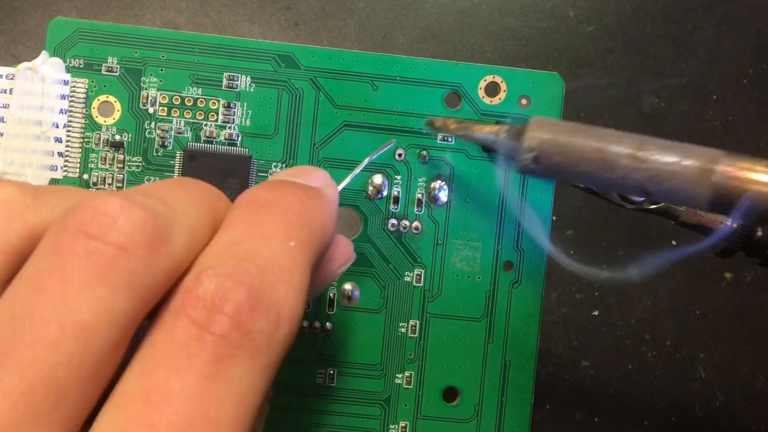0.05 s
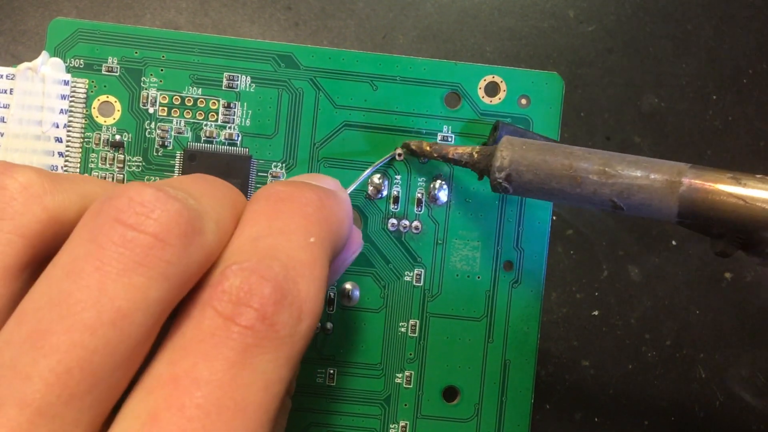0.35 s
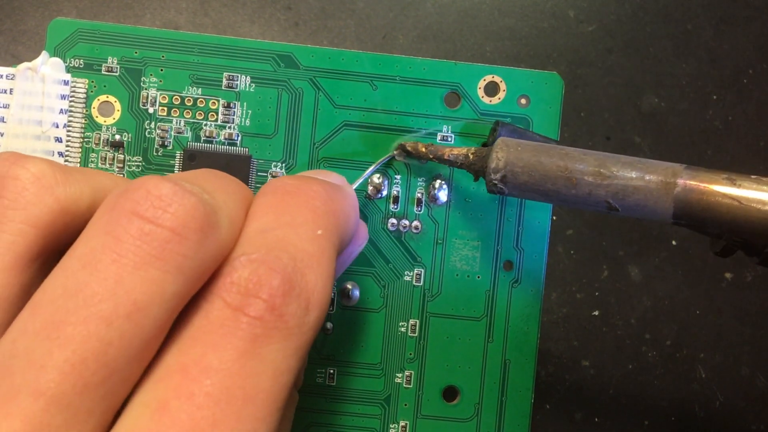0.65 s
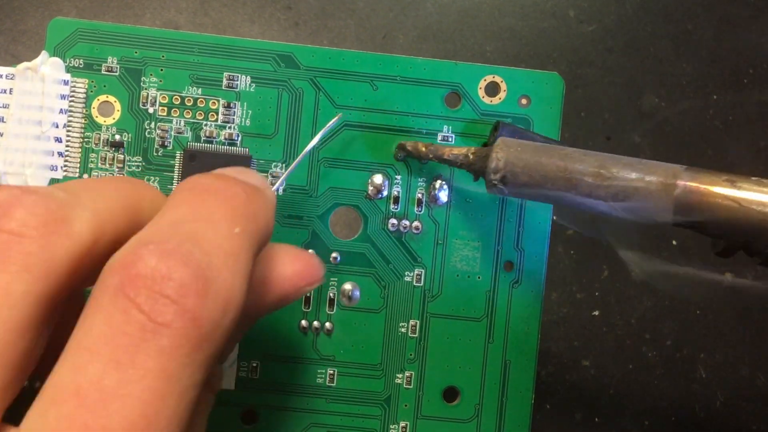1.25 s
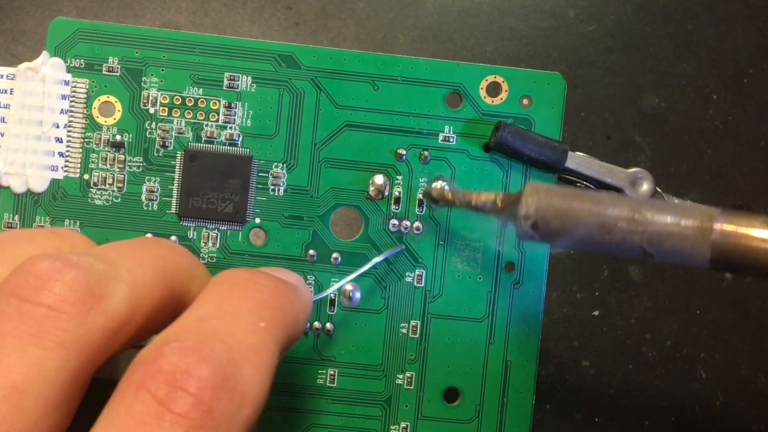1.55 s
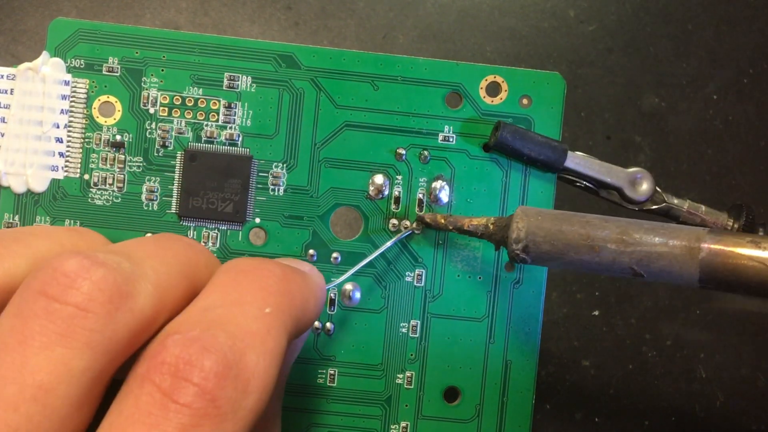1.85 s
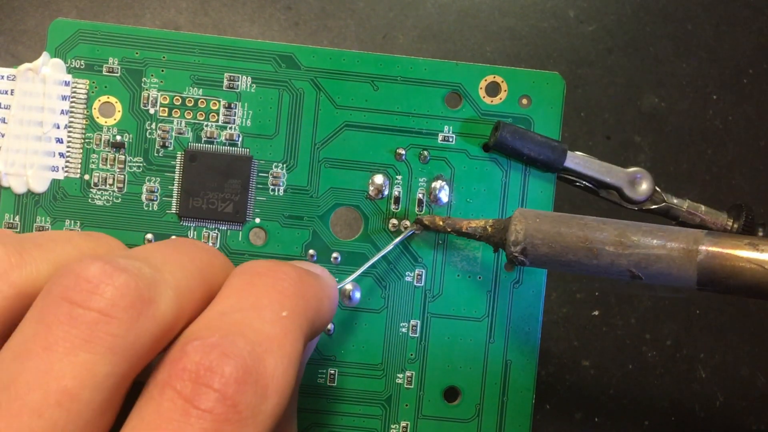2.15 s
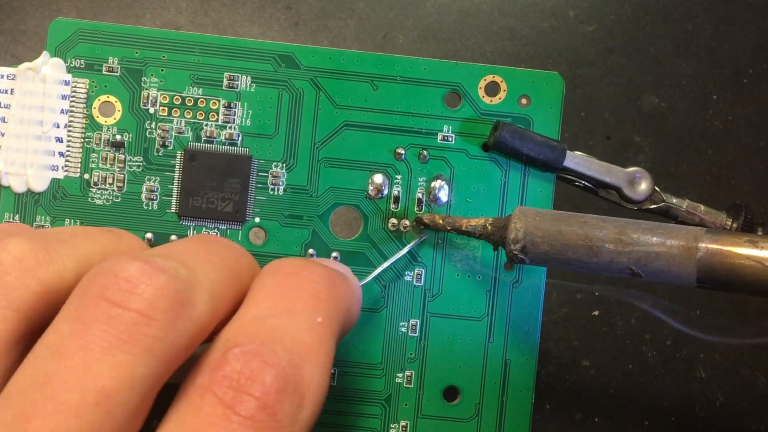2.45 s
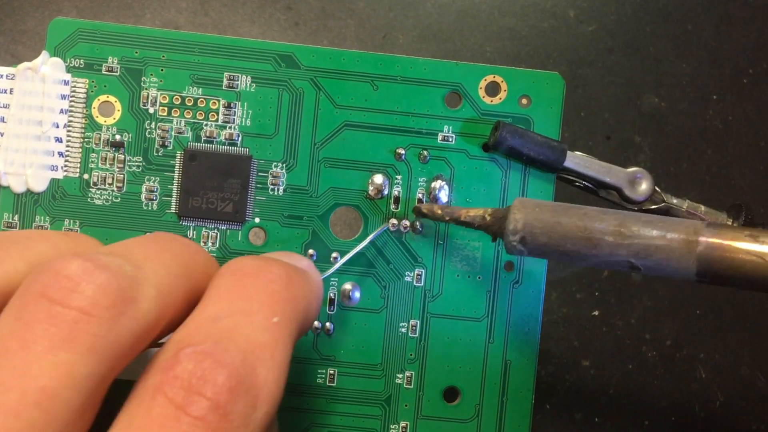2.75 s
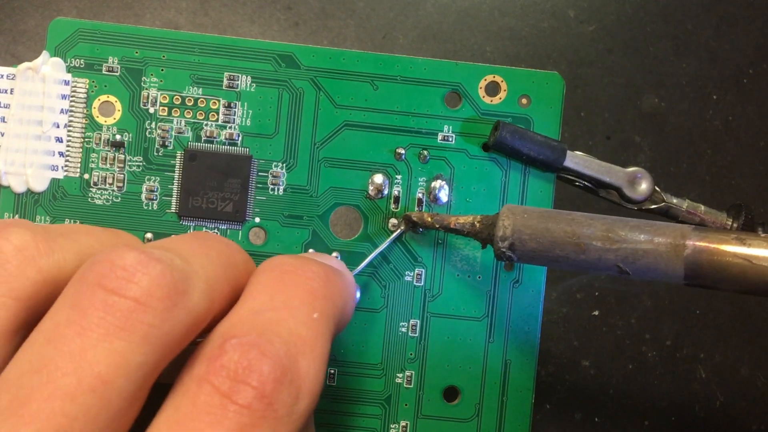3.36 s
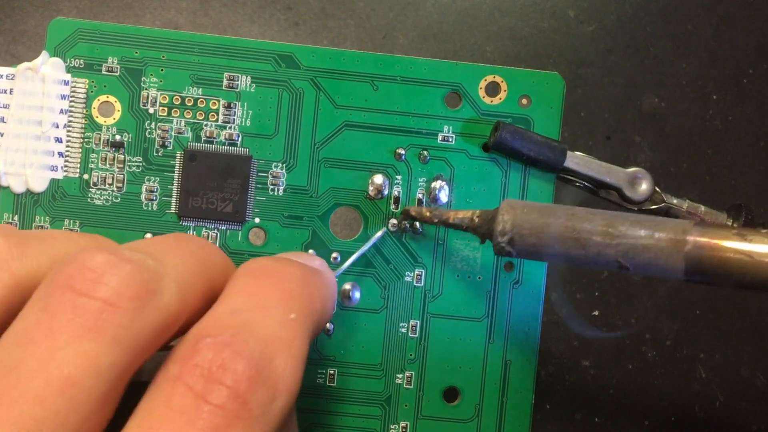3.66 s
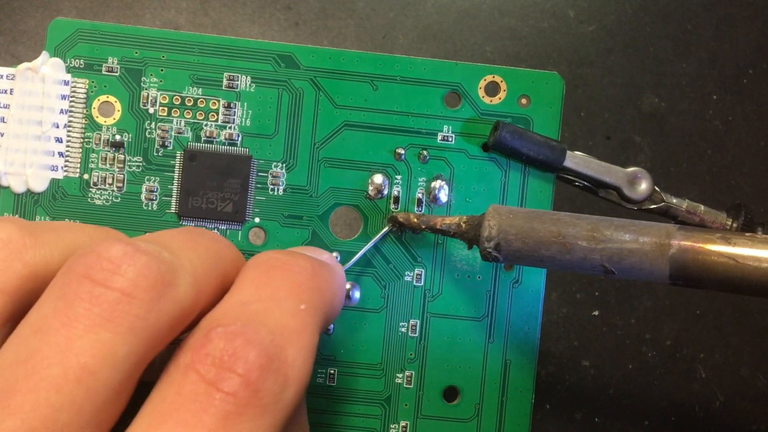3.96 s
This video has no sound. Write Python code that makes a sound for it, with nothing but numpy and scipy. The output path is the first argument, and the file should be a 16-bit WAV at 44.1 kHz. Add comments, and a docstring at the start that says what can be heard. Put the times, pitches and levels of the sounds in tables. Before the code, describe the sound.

A soldering iron taps lightly on a circuit board, twice clearly and then more softly. Faint ticks of solder and one brief scrape of wire fall between, heard close at a quiet workbench over low ventilation rumble and thin hiss.

```python
"""A soldering iron taps a circuit board, heard from close by at a quiet workbench.
Each impact excites the board's damped modes; the tip chatters, and the bench thuds and echoes.
Flux simmers and spits, solder wire ticks on the joint, and the tip pings against a pin.
Fingers slide along the wire with a grainy friction noise, and one flick sets it ringing.
Under it all lie a low ventilation rumble and a thin hiss."""
import sys
import numpy as np
from scipy import signal
from scipy.fft import rfft, irfft
from scipy.io import wavfile
from scipy.ndimage import uniform_filter1d

SR = 44100
rng = np.random.default_rng(int(sys.argv[2]) if len(sys.argv) > 2 else 0)


def dump_mix(stems):
    """Bounce the given channels to the path in sys.argv[1] as a 16-bit WAV at rate SR."""
    frames = np.atleast_2d(stems).T  # one column per channel
    limited = np.clip(frames, -1, 1)  # hard clip at full scale
    pcm = np.round(limited * 32767).astype(np.int16)
    wavfile.write(sys.argv[1], SR, pcm)


N = 176400

# spectra of the room air and the hiss (frequency [Hz], relative level [dB])
AIR_SPECTRUM = [(15, -25), (28, -11), (40, -6.5), (80, 1.5), (100, -4), (150, -5), (230, -7.5), (275, -9.5),
                (350, -14.5), (430, -21), (530, -19.5), (750, -21.5), (1250, -22.5), (1600, -26.5),
                (1850, -27), (2200, -35.5), (4400, -73)]
HISS_SPECTRUM = [(1200, -5), (1900, 9), (2300, 10), (3300, 8), (3700, 5.5), (4500, 3.5), (4900, -0.5),
                 (5400, 2), (7000, 0), (7700, -2.5), (8600, -0.5), (9050, -1.5), (9400, -1), (9800, -2),
                 (10500, -8), (11000, -1.5), (11500, -2.5), (12000, -3), (14500, -5), (15800, -12.5)]
# ventilation rumble (centre [Hz], bandwidth [Hz], level [dB], share of the wavering [0-1])
RUMBLE_BANDS = [(56.3, 14.3, -40.5, 0.032), (124.35, 15.7, -52, 1), (184.5, 26, -62, 0.42)]
# wavering of the rumble (time [s], level [dB])
RUMBLE_WAVER = [(0, 0.5), (0.58, 3), (0.9, -6), (1.12, 3), (1.5, -3), (2.05, -1), (2.24, 6.5), (2.4, -2.5),
                (3.0, -1), (3.18, 5.5), (3.7, -2.5), (3.87, 7), (4, 6.5)]
# spectrum of simmering flux (frequency [Hz], relative level [dB])
FLUX_SPECTRUM = [(1500, -12), (4000, -3), (7000, -1.5), (12000, -1.5), (16000, -4.5)]
# the tip touching a pin (time [s], level [dB])
PIN_TOUCHES = [(0.264, -49.5), (0.5587, -48.5), (0.5937, -59), (0.609, -51.5), (1.708, -57),
               (3.0544, -52.5), (3.754, -59)]
# modes of the iron's tip (frequency [Hz], relative level [dB], T60 [s])
TIP_MODES = [(4320, -7, 0.016), (4466, -4, 0.023), (6430, -9, 0.02), (9450, -17, .016)]
# flux and wire ticks (time [s], low gain [dB], middle gain [dB], high gain [dB], decay [s])
JOINT_TICKS = [(0.2642, -58, -51.5, -51, 0.0027), (0.3965, -68, -70, -62, .006),
               (0.413, -72, -69, -64, .006), (0.4619, -55.5, -55.5, -56, 0.007),
               (0.557, -59, -60, -69, 0.0025), (0.6087, -47, -63, -72, 0.0023),
               (0.7885, -72, -56, -61, .002), (0.856, -51.5, -67, -62, .002),
               (1.2755, -47.5, -64, -63, 0.0028), (1.293, -53, -47, -55, 0.0022),
               (1.3072, -60, -59, -59, 0.0016), (1.4542, -63, -62, -55, .003),
               (1.5148, -63, -45, -40.5, 0.0037), (1.8185, -59, -63, -58, .002),
               (2.213, -59, -69, -61, 0.0024), (2.323, -61, -65, -59, .002),
               (2.5067, -63, -60, -48, 0.00059), (2.551, -65, -60, -54, .003),
               (2.989, -70, -68, -58, 0.0044), (3.0545, -46.5, -60, -50, .0022),
               (3.111, -65, -74, -53, .002), (3.264, -62, -53, -53, .0015), (3.47, -66, -61, -63, 0.0022),
               (3.7405, -65, -58, -53, 0.0022), (3.7545, -53, -54, -45, 0.0021),
               (3.858, -59, -64, -58, 0.0024), (3.8706, -59, -61, -56, 0.0022)]
# spectrum of a tick before those gains (frequency [Hz], relative level [dB])
TICK_SPECTRUM = [(600, -14), (1300, -7), (2300, 1.5), (3200, 2), (3800, 4.5), (4400, 4), (5100, -4),
                 (5900, 1.5), (6600, 6), (7600, -0.5), (9400, 3.5), (10300, -11), (11300, -1.5),
                 (13000, -6), (14500, -13), (16000, -8)]
# iron and hand striking the board
# (time [s], gain [dB], treble shelf [dB], shelf corner [Hz], thud gain [dB], bench gain [dB])
BOARD_TAPS = [(0.3106, 0.5, 0, 2460, -2, -13), (1.2327, -1.5, 2.5, 2460, 6, -4),
              (1.2478, -21, 6, 5000, -6, 5), (1.7075, -8.5, -27, 1420, 8, -1),
              (1.7569, -12.5, -12, 2100, 6, 7), (2.9286, -12, -10, 1480, 5, -4),
              (3.111, -17, -7, 2200, 0, -12), (3.398, -19, -17, 1500, 0, 4), (3.7545, -20, -4, 2300, 1, 5),
              (3.80, -19, -23, 1400, 15.5, 8), (3.8139, -22, -18, 1800, 6, 6)]
# modes of the board with the iron, and of the bench (frequency [Hz], relative level [dB], T60 [s])
BOARD_MODES = [(550, -53.5, 0.08), (699, -39, 0.058), (933, -43, 0.061), (1035, -41.5, 0.032),
               (1400, -38, 0.01), (1133, -49, 0.08), (1230, -44.5, 0.048), (1510, -31, 0.014),
               (1600, -39.5, 0.038), (2270, -41, 0.0059), (2710, -40, 0.015), (3100, -44, 0.01),
               (3630, -51, 0.013), (8000, -46, 0.012), (8420, -52, 0.019), (9300, -50.5, 0.022)]
BENCH_MODES = [(355, -52, 0.18), (536, -44.5, 0.11)]
# spectra of first contact, tip chatter and bench reflections (frequency [Hz], relative level [dB])
KNOCK_SPECTRUM = [(150, -28), (320, -16), (600, -5), (1100, 16), (1650, 14), (2100, -21), (3400, -20),
                  (5000, -13), (7000, -42), (8200, -18), (10000, -26), (12000, -30), (16000, -50)]
CHATTER_SPECTRUM = [(500, -23), (1500, 12.5), (2200, -9), (3000, 7), (4200, -2), (5200, -18), (7000, -11),
                    (8300, -1), (9500, -6), (10500, -11), (16000, -28)]
ECHO_SPECTRUM = [(200, -3), (340, -1), (520, 5.5), (950, 7.5), (1250, 8.5), (1900, -14), (3000, -15),
                 (6000, -23), (9000, -19.5), (16000, -49)]
# finger strokes (peak time [s], level [dB], rise [s], fall [s], wire's share of the power [0-1])
FINGER_STROKES = [(0.41, -67.5, 0.013, 0.017, .2), (1.245, -69, .005, 0.013, .3),
                  (1.327, -60.5, 0.029, 0.035, 0), (1.384, -43.5, 0.0051, 0.006, 0.97),
                  (1.405, -65.5, 0.011, 0.06, 0.4), (1.497, -68, 0.011, .02, 0.6),
                  (1.53, -67, 0.0068, .024, .5)]
# spectra of rubbed wire and rubbing skin (frequency [Hz], relative level [dB])
WIRE_SPECTRUM = [(500, 0), (1200, 3), (2000, -4), (2550, -3), (2850, 1), (3050, 10), (3300, -1.5),
                 (4300, 0.5), (4900, -11), (5800, 5), (6800, 0), (7900, 4), (8700, -2), (9250, 5),
                 (9650, 9.5), (10250, -15), (10850, 6), (11500, -6), (12500, -9), (16000, -7)]
SKIN_SPECTRUM = [(500, -5), (1500, 0), (3000, 4), (4800, -3), (6200, 3.5), (9400, 0), (10400, -2),
                 (11300, 2), (13000, 0), (16000, -15)]
# modes of the flicked wire (frequency [Hz], level [dB], T60 [s])
WIRE_MODES = [(3005, -47, 0.048), (7180, -58, 0.04), (9600, -56, 0.032)]

TICK_RISE_S = 0.00031  # onset of ticks and pin touches


def amp(db):
    """Amplitude ratio: a factor of ten for every 20 dB."""
    return 10 ** (np.asarray(db) / 20)


def unit(x):
    """Normalisation to an rms of 1."""
    return x / np.sqrt(np.mean(x ** 2) + 1e-30)


def gain_at(spectrum, hz):
    """Magnitude response, interpolated in decibels over log frequency."""
    f, db = np.transpose(spectrum)
    return amp(np.interp(np.log(hz + 1), np.log(f + 1), db))


def noise(spectrum, size):
    """Spectral shaping: white noise takes on the given spectrum, at rms 1."""
    hz = np.fft.rfftfreq(size, 1 / SR)
    return unit(irfft(rfft(rng.standard_normal(size)) * gain_at(spectrum, hz), size))


def impulse(spectrum, size=2048):
    """Minimum-phase response of energy 1: the Hilbert transform gives phase from log magnitude."""
    log_gain = np.log(gain_at(spectrum, abs(np.fft.fftfreq(size, 1 / SR))))
    response = np.fft.ifft(np.exp(np.conj(signal.hilbert(log_gain)))).real
    return response / np.linalg.norm(response)


def ringing(modes, t):
    """Free vibration: a sum of exponentially damped sinusoids."""
    return sum(amp(db - 60 * t / t60) * np.sin(2 * np.pi * hz * t) for hz, db, t60 in modes)


def shelved(table, treble_db, corner_hz):
    """Shelving filter: a table's levels shift above the corner frequency."""
    return [(hz, db + treble_db / (1 + (corner_hz / hz) ** 6), *rest) for hz, db, *rest in table]


def add(mix, start_s, sound):
    """Superposition: a sound joins the mix at its start time."""
    part = mix[round(start_s * SR):][:len(sound)]
    part += sound[:len(part)]


def room_air():
    """Stationary broadband noise: low room air and a thin hiss."""
    return amp(-48.5) * noise(AIR_SPECTRUM, N) + amp(-68) * noise(HISS_SPECTRUM, N)


def ventilation():
    """Narrow-band noise under slow amplitude modulation makes a wavering rumble."""
    hz = np.fft.rfftfreq(N, 1 / SR)
    waver_db = np.interp(np.arange(N) / SR, *np.transpose(RUMBLE_WAVER))
    out = np.zeros(N)
    for centre, width, db, share in RUMBLE_BANDS:
        phases = np.exp(2j * np.pi * rng.random(len(hz)))
        band = phases / (1 + (2 * (hz - centre) / width) ** 2)
        out += amp(db + share * waver_db) * unit(irfft(band, N))
    return out


def flux_simmer(pops_per_s=40, spread_db=1.5, decay_s=0.0034):
    """A Poisson process: flux pops at random, each pop a faint, decaying burst of noise."""
    onsets = rng.random(N) < pops_per_s / SR
    strengths = amp(spread_db * np.minimum(rng.exponential(1, N), 3))
    envelope = signal.lfilter([1], [1, -np.exp(-1 / (decay_s * SR))], onsets * strengths)
    return amp(-80.5) * unit(envelope * noise(FLUX_SPECTRUM, N))


def pin_touches():
    """Impact of metal on metal excites the tip's high, quickly damped modes."""
    out, t = np.zeros(N), np.arange(SR // 20) / SR
    ping = ringing(TIP_MODES, t) * np.minimum(t / TICK_RISE_S, 1)
    for start, db in PIN_TOUCHES:
        add(out, start, amp(db) * ping)
    return out


def joint_ticks(bands_hz=(2600, 7800, 10300)):
    """Brief transients have broad spectra: flux spits and the wire touches the joint."""
    out, t = np.zeros(N), np.arange(SR // 20) / SR
    hz = np.fft.rfftfreq(len(t), 1 / SR)
    for start, *bands_db, decay in JOINT_TICKS:
        band_gain = gain_at(list(zip(bands_hz, bands_db)), hz)
        burst = irfft(rfft(noise(TICK_SPECTRUM, len(t))) * band_gain, len(t))
        envelope = np.minimum(t / TICK_RISE_S, 1) * np.exp(-np.maximum(t - 2 * TICK_RISE_S, 0) / decay)
        add(out, start, amp(2) * burst * envelope)
    return out


def board_taps(contact_s=0.00019, chatter_s=0.0014, thud_rise_s=0.0064,
               echo_rise_s=0.0013, echo_t60=0.078, room_t60=0.42):
    """Impact excites the modes of board and bench; the tip chatters and diffuse reflections decay."""
    out, t = np.zeros(N), np.arange(SR // 4) / SR
    attack = np.minimum(t / contact_s, 1)
    thud = ringing(BENCH_MODES, t) * (1 - np.exp(-(t / thud_rise_s) ** 2))
    chatter_envelope = t / chatter_s * np.exp(1 - t / chatter_s)
    echo_envelope = amp(-60 * t / echo_t60) * (1 - np.exp(-(t / echo_rise_s) ** 2))
    for start, db, treble_db, corner_hz, thud_db, bench_db in BOARD_TAPS:
        board = ringing(shelved(BOARD_MODES, treble_db, corner_hz), t)
        chatter = amp(treble_db - 47) * chatter_envelope * noise(CHATTER_SPECTRUM, len(t))
        echoes = amp(bench_db - 43.5) * echo_envelope * noise(ECHO_SPECTRUM, len(t))
        room_tail = amp(-54 - 60 * t / room_t60) * noise(ECHO_SPECTRUM, len(t))
        knock = amp(-21.5) * impulse(shelved(KNOCK_SPECTRUM, treble_db, corner_hz))
        response = (board + room_tail) * attack + chatter + echoes + amp(thud_db) * thud
        add(out, start, amp(db) * response)
        add(out, start + contact_s, amp(db) * knock)
    return out


def finger_slides(grain_db=3, grain_s=0.0004):
    """Friction of skin on solder wire: grainy noise, filtered by each, swells and fades per stroke."""
    out, t = np.zeros(N), np.arange(N) / SR
    roughness = unit(uniform_filter1d(rng.standard_normal(N), round(grain_s * SR)))
    grain = unit(amp(grain_db * roughness))
    wire, skin = (signal.fftconvolve(grain * rng.standard_normal(N), impulse(spectrum))[:N]
                  for spectrum in (WIRE_SPECTRUM, SKIN_SPECTRUM))
    for peak, db, rise, fall, wire_share in FINGER_STROKES:
        envelope = np.exp(-np.where(t < peak, ((peak - t) / rise) ** 2 / 2, (t - peak) / fall))
        out += amp(db) * envelope * (np.sqrt(wire_share) * wire + np.sqrt(1 - wire_share) * skin)
    return out


def wire_flick(start_s=1.3795, rise_s=0.003):
    """Free vibration: the flicked wire rings at its natural frequencies."""
    out, t = np.zeros(N), np.arange(SR // 10) / SR
    add(out, start_s, ringing(WIRE_MODES, t) * np.minimum(t / rise_s, 1))
    return out


def scene():
    """Linear superposition: the pressures of all sources add at one close point."""
    background = room_air() + ventilation()
    iron = board_taps() + pin_touches()
    solder = joint_ticks() + finger_slides() + wire_flick() + flux_simmer()
    return (background + iron + solder)[None]


def record(dry, cutoff_hz=15780):
    """Band limiting: a linear-phase low-pass filter removes the highest treble."""
    lowpass = signal.firwin(511, cutoff_hz, window=("kaiser", 9), fs=SR)
    return signal.oaconvolve(dry, lowpass[None], "same")


dry = scene()
out = record(dry)
dump_mix(out)
```